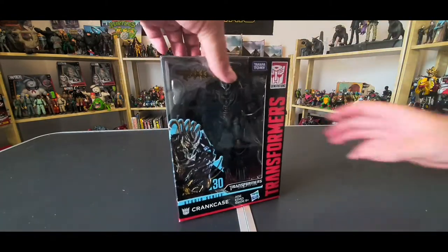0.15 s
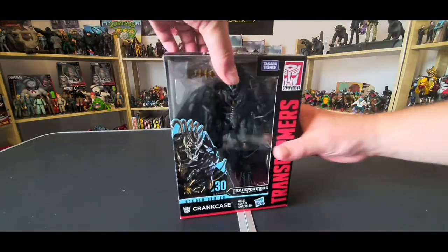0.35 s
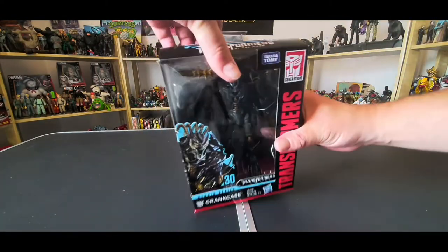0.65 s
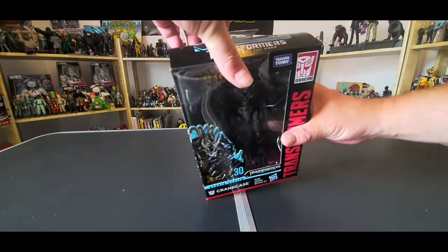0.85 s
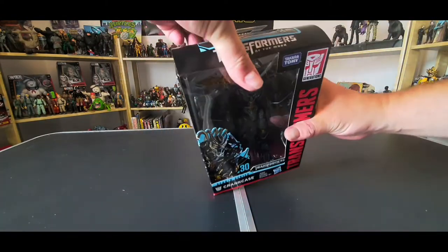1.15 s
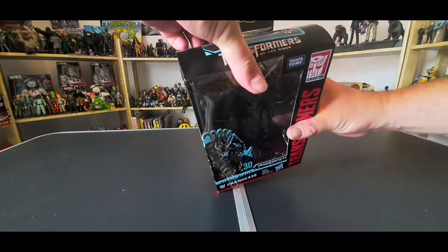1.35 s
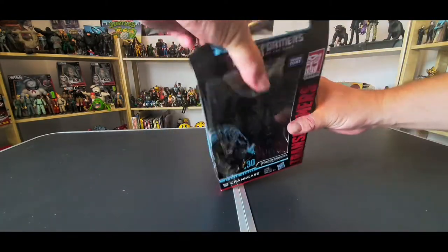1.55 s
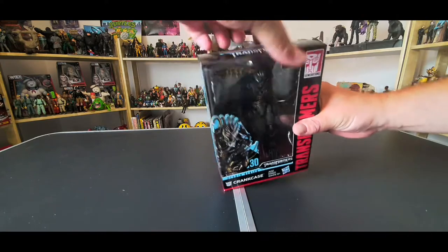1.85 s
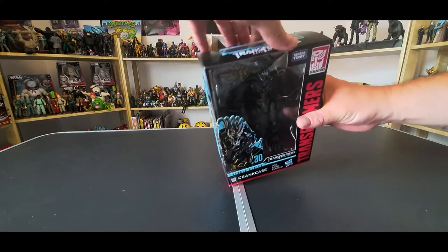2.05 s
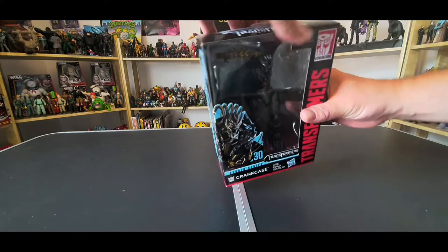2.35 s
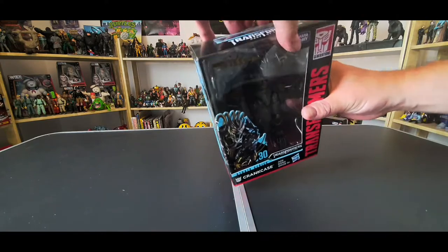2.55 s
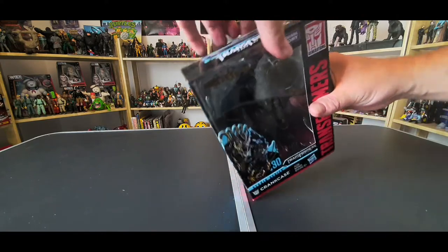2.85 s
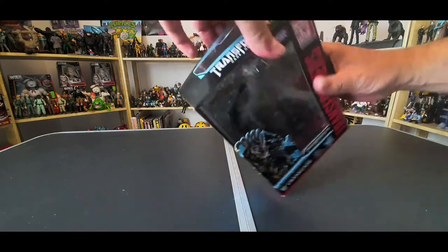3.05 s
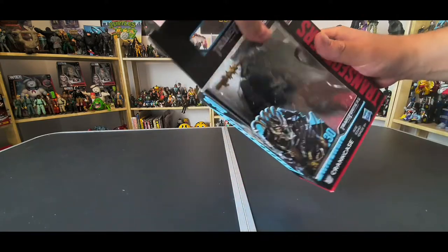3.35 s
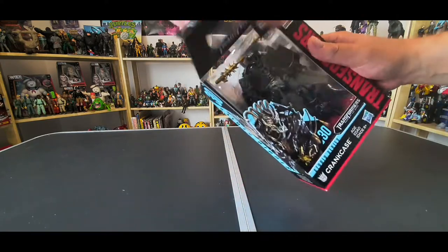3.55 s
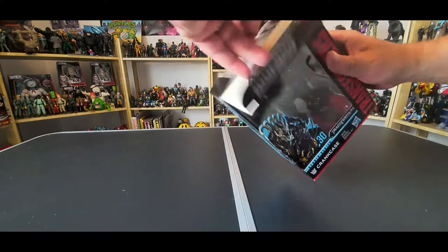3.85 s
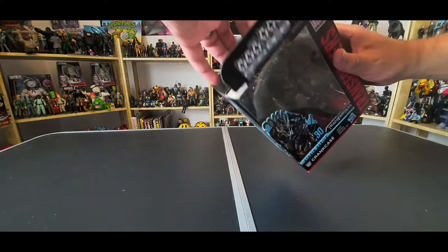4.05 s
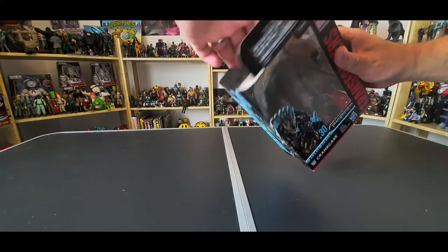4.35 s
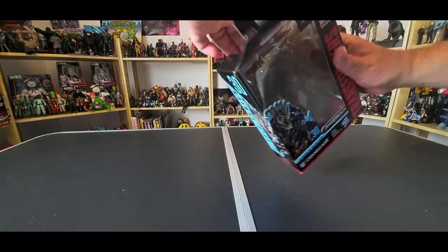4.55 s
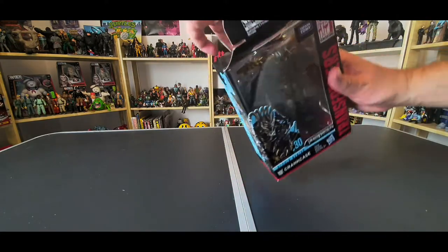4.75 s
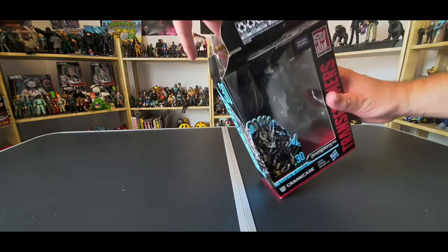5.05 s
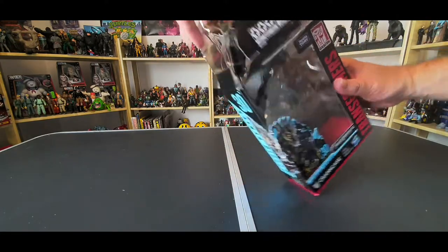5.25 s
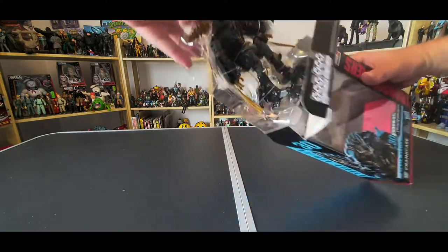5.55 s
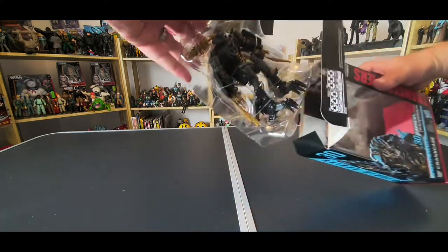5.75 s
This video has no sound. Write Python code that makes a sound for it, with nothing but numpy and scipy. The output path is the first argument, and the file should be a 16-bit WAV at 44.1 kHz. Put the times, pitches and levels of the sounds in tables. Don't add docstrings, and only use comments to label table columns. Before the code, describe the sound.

Close in a small lively room, fingers rub and click on a box's plastic window, then tap its hollow cardboard. One loud knock lands on the table, followed by lighter taps. A dense burst of knocks and bright lid pops comes midway, then separate sharp snaps as the plastic tray is pulled, and a softer sliding scrape at the end.

```python
import sys
import numpy as np
from scipy import signal
from scipy.fft import rfft, irfft, next_fast_len
from scipy.io import wavfile
from scipy.ndimage import uniform_filter1d, map_coordinates

SR = 44100
rng = np.random.default_rng(int(sys.argv[2]) if len(sys.argv) > 2 else 0)


def gain_from_db(level_db):
    decades = np.asarray(level_db, float) / 20
    return 10 ** decades


def wav_record(signal):
    frames = np.transpose(np.atleast_2d(signal))
    bounded = np.clip(frames, -1, 1)
    quanta = np.round(bounded * 32767).astype(np.int16)
    wavfile.write(sys.argv[1], SR, quanta)


N = 259308

# (time [s], crack level [dB], hollow against crack [dB])
PRESSES = [
    (.142, -44, -2.5),
    (.228, -52, -5),
    (.275, -51.5, 6),
    (.303, -49.5, -15),
    (.38, -31, -8),
    (0.474, -48, -9),
    (.488, -70, -9),
]
# (time [s], hollow level [dB], hardness [dB])
TAPS = [(.07, -52, -28), (0.547, -42, -22), (.758, -38, -6.5), (.786, -61, -10), (0.837, -39, -8),
        (0.942, -47, -25), (.98, -40, -13), (1.073, -43, -10), (1.211, -44.5, -6), (1.237, -38.5, -29),
        (1.35, -33, -12.5), (1.435, -35, -14.5), (1.545, -34.5, -5.5), (1.942, -39, -25),
        (2.081, -46.5, -16), (2.309, -51, -15), (2.331, -65, -4), (2.357, -41.5, -19.5), (2.43, -48, -27),
        (2.478, -55.5, -11), (2.555, -35, -10.5), (2.736, -42.5, -12), (2.78, -42, -6), (2.981, -40, -11)]
# (time [s], hollow level [dB], panel against hollow [dB], crack against hollow [dB])
KNOCKS = [(1.518, -48.5, 4, -20), (1.604, -9, -7, -14), (1.783, -27, -11, -4.5), (1.862, -29, -9, -12),
          (1.966, -41, -4.5, -13), (2.632, -24, -7, -13.5), (2.996, -46, 3.5, -4), (3.041, -33, -7, -8),
          (3.099, -24.5, -11, -7.5), (3.137, -21.5, -4.5, 0), (3.156, -12.5, -1.5, -10.5),
          (3.189, -17.5, -7, -33), (3.228, -12, 0.5, -6), (3.292, -13, -0.5, -24), (3.656, -46, 3, -9),
          (3.712, -30, 4.5, -5.5), (3.973, -46.5, -22, -18), (3.989, -42, -35.5, -34),
          (4.027, -37, -6, -13), (4.102, -32, -9, -20), (4.25, -38.5, -8, -18), (4.292, -30, -6.5, -18),
          (4.335, -40, -1, -13), (4.389, -55, -6, 2), (4.412, -30, -30, -40), (4.719, -31, -12, -22),
          (4.988, -36.5, -1, -15), (5.536, -44, 4, -5), (5.587, -43, -2, -23), (5.762, -47, -17, -21)]
# (time [s], panel
# level [dB], panel frequency [Hz], crack against panel [dB], hollow against panel [dB])
LID_POPS = [(.356, -50.5, 1090, -24, 10.5), (.576, -36.5, 1000, -32, 16), (.691, -32, 1680, -4, -4.5),
            (1.12, -41, 1450, 3, 0.5), (1.252, -25.5, 1090, -1, -9), (1.648, -19.5, 1510, -1, -12),
            (1.654, -13, 1500, -11.5, 1), (1.704, -17.5, 1610, -9.5, -2), (3.239, -9, 939, -4, -35.5),
            (3.322, -13.5, 2130, -2.5, -6), (3.409, -5.5, 2540, 0.7, -0.5), (3.427, -12.5, 1575, -1, -15),
            (3.456, -14, 1140, -23, -20)]
# (time [s], panel level [dB], panel frequency [Hz], crack against panel [dB], hollow against panel [dB])
TRAY_SNAPS = [(3.792, -37, 2140, -7, 2), (3.826, -37, 1630, -5.5, -22), (4.176, -30.5, 2830, 4, -7.5),
              (4.458, -23, 1050, -4.5, -5), (4.495, -11, 2200, -2.5, -14), (4.583, -29, 1340, -22, -6.5),
              (4.639, -20.5, 1090, -11, -9), (4.729, -9, 1140, -13, -12.5), (4.797, -23.5, 1410, -14, -10),
              (4.843, -10.5, 1220, -4, -12), (4.911, -28, 2960, -14, -1.5),
              (5.018, -15.5, 1250, -5.5, -12.5), (5.353, -39, 1260, -1, -31),
              (5.449, -27.5, 1300, -37, -16)]
# (time [s], frequency [Hz], peak level
# [dB])
LID_PINGS = [(.15, 2280, -46), (.384, 2400, -47), (.304, 520, -44), (.358, 770, -34.5), (.486, 3260, -49),
             (0.487, 5550, -50), (.49, 2630, -48), (0.579, 1640, -40), (0.711, 1680, -38), (.868, 580, -40),
             (0.997, 1680, -46.5), (1.122, 5180, -43), (1.252, 3230, -30.5), (1.253, 715, -30),
             (1.275, 2940, -41), (1.451, 605, -44.5), (1.467, 1950, -47.5), (1.546, 567, -25),
             (1.653, 1500, -14), (1.659, 1430, -24.5), (1.667, 1610, -20), (1.617, 470, -21.5),
             (1.627, 596, -23), (1.685, 1670, -23.5), (1.865, 1000, -39), (1.712, 1610, -26),
             (1.717, 610, -19.5), (2.361, 1340, -62), (2.366, 504, -38.5), (2.431, 1224, -65),
             (2.569, 524, -32.5), (2.645, 540, -31), (2.781, 520, -38), (3.042, 1120, -35),
             (3.043, 3370, -43.5), (3.157, 620, -27.5), (3.19, 626, -16.5), (3.194, 950, -24.5),
             (3.202, 576, -21), (3.228, 630, -11), (3.238, 3600, -25), (3.25, 1065, -17.5),
             (3.265, 1290, -22.5), (3.292, 580, -16.5), (3.298, 625, -16), (3.322, 827, -11.5),
             (3.326, 810, -16.5), (3.357, 2670, -25.5), (3.404, 890, -31.5), (3.34, 2015, -25.5),
             (3.348, 1950, -14.5),
             (3.409, 2400, -9), (3.412, 663, -6), (3.431, 634, -10.5), (3.436, 560, -11),
              (3.456, 1160, -15), (3.462, 660, -20.5), (3.444, 1180, -13.5), (3.418, 2400, -17),
              (3.434, 2724, -22), (3.5, 1450, -32), (3.476, 1080, -21.5), (3.719, 566, -24.5),
              (3.732, 1970, -33)]
# (time [s], frequency [Hz], peak level [dB])
TRAY_PINGS = [(4.04, 614, -35.5), (4.178, 12000, -43), (4.497, 12500, -33), (4.84, 12200, -36),
              (4.91, 12000, -48), (4.51, 2170, -31), (4.855, 2930, -28), (5.008, 1500, -35),
              (5.012, 605, -28), (5.77, 704, -49.5), (4.116, 575, -39), (4.177, 7190, -29.5),
              (4.185, 7700, -37), (4.192, 7700, -35), (4.195, 3320, -42), (4.293, 3490, -47),
              (4.311, 3140, -47), (4.416, 1200, -37), (4.423, 550, -30), (4.457, 1240, -26),
              (4.496, 762, -17), (4.515, 3060, -31), (4.517, 6670, -26), (4.585, 605, -31),
              (4.591, 1390, -26), (4.611, 3470, -38), (4.639, 3560, -31), (4.639, 755, -25),
              (4.731, 1235, -15), (4.733, 800, -35), (4.751, 1110, -32), (4.768, 1224, -34),
              (4.91, 583, -39), (4.922, 570, -33), (4.743, 764, -20.5), (4.844, 5380, -20),
              (4.847, 2710, -18.5), (4.853, 5370, -32), (4.868, 5540, -36), (5.0185, 1760, -21),
              (5.021, 1070, -39), (5.025, 3920, -25), (5.035, 1850, -26), (5.055, 1300, -29.5),
              (5.217, 1370, -39), (5.268, 880, -48), (5.3, 1100, -39), (5.351, 9400, -45),
              (5.358, 1290, -33), (5.449, 1290, -27.5), (5.449, 3480, -40), (5.456, 3120, -42),
              (5.558, 3230, -40.5), (5.591, 1103, -44)]
# (time [s], peak level [dB])
TICKS = [(0.869, -41), (0.994, -44.5), (1.0125, -47), (1.0535, -39), (1.2024, -47), (4.0344, -42),
         (4.107, -38), (4.1205, -34.5), (4.1274, -52), (4.611, -31), (4.839, -30), (5.5313, -37)]
# (time [s], peak level [dB])
MORE_TICKS = [
    (1.519, -55),
    (1.526, -48),
    (1.535, -50),
    (1.836, -40),
    (1.962, -45),
    (2.716, -56),
    (2.979, -53),
    (3.155, -22),
    (4.718, -44),
    (5.008, -44),
]
# (start [s], hold [s], hollow level [dB], card against hollow [dB])
STROKES = [(0, 0.19, -59.5, -17), (0.274, 0.053, -52.5, -6), (0.437, 0.093, -50.5, -4.5),
           (0.696, 0.11, -54, -4), (0.972, 0.08, -51.5, -5.5), (1.305, 0.084, -56.5, -8),
           (1.572, 0.14, -41.5, -9.5), (1.789, 0.087, -38.5, -5), (2.21, 0.097, -64.5, -25),
           (2.366, 0.15, -68.5, -19), (2.634, 0.03, -57, 1.5), (2.746, 0.055, -49.5, -9),
           (2.87, 0.087, -55.5, -13.5), (3.026, 0.013, -46, -5), (3.142, 0.03, -49.5, 16.5),
           (3.248, 0.022, -44.5, 14), (3.333, 0.035, -44, 13), (3.418, .04, -42.5, 10.5),
           (3.634, 0.029, -55.5, 0), (3.706, 0.2, -57, -3.5), (3.93, 0.021, -60.5, -8),
           (4.065, 0.1, -55, -4.5), (4.157, 0.019, -50.5, -9), (4.395, 0.037, -52.5, 0),
           (4.548, 0.024, -40, -3.5), (4.984, 0.052, -43, -6.5), (5.146, 0.19, -46, -3),
           (5.59, 0.086, -53.5, -6.5), (5.742, 0.023, -63.5, -4)]
# (start [s], hold [s], level [dB])
RUSTLES = [(.6, 0.064, -69), (0.874, 0.034, -66), (1.568, .035, -61.5), (1.66, 0.057, -42),
           (1.785, 0.012, -53.5), (1.843, 0.034, -55), (2.704, 0.054, -74), (2.858, 0.11, -75),
           (3.261, .03, -42.5), (3.323, 0.044, -30.5), (3.407, 0.04, -33.5), (4.04, .2, -72),
           (4.93, .07, -67), (5.1, .36, -64), (5.498, 0.086, -60), (5.65, 0.13, -69.5),
           (5.819, 0.067, -71.5)]
# (time [s], level [dB])
SLIDE = [
    (5.06, -45.5),
    (5.16, -50.5),
    (5.23, -48),
    (5.31, -49),
    (5.388, -49),
    (5.458, -52),
    (5.552, -48.5),
    (5.64, -58.5),
    (5.75, -70),
]
# (time [s], frequency [Hz], peak level [dB], length [s])
SLIPS = [
    (5.528, 477, -32.5, 0.03),
    (5.662, 990, -53, 0.043),
    (5.68, 1740, -59, 0.021),
]
# (time [s], level [dB])
CARD_CATCHES = [
    (2.357, -65),
    (2.428, -71),
    (2.478, -70),
    (2.736, -59),
    (2.979, -57),
    (3.099, -40.5),
    (5.587, -56),
    (5.76, -65.5),
]
# (time [s], level [dB])
WINDOW_DRAGS = [
    (0.141, -60),
    (.229, -61),
    (.381, -59),
    (.42, -63),
]
# (time [s], peak level [dB], frequency [Hz])
THUMPS = [(0.377, -44.5, 108), (0.576, -37.5, 234), (0.679, -43.5, 188), (0.93, -60, 53.8),
          (1.25, -69, 293), (1.605, -23.5, 295), (1.65, -28, 83.4), (1.777, -33.5, 131), (1.96, -38, 56.5),
          (2.358, -57, 84), (2.555, -48, 290), (2.63, -34, 288), (2.776, -48, 105), (3.029, -42, 150),
          (3.109, -40, 102), (3.185, -30, 192), (3.228, -28.5, 125.6), (3.294, -24, 250), (3.41, -32, 300),
          (3.432, -23.5, 78), (3.713, -29, 155), (3.973, -44.5, 56.5), (4.423, -67, 299),
          (4.493, -70.5, 280), (4.724, -41.5, 149), (4.841, -34.5, 206), (5.005, -27, 114),
          (5.517, -44, 207.3), (5.668, -52.5, 105)]
# (time [s], level [dB])
SHIFTS = [(.14, -61.5), (.72, -77), (1.02, -59.5), (2.08, -56.5), (2.36, -64.5), (2.66, -70), (2.8, -71),
          (3.72, -63.5), (4.3, -61), (4.55, -59), (5.18, -61), (5.4, -61), (5.6, -67)]

# (frequency [Hz], width [Hz], level [dB])
HOLLOW_MODES = [(400.4, 140, -9.5), (514.8, 36, 4), (603, 51.6, -1), (716, 130, -4)]
# (frequency [Hz], width [Hz], level [dB])
FILM_MODES = [(2400, 410, 8), (3940, 350, 3), (6000, 690, 5.5), (6870, 380, 7.5), (7700, 500, 8),
              (9250, 350, 4), (10800, 1600, -1)]
# (frequency [Hz], density [dB per Hz])
CARD_COLOUR = [(410, -38.5), (700, -4.5), (884, -4), (1040, 0), (1300, -4.5), (1570, -8.5), (3450, -17),
               (4500, -24.5), (5850, -56.5), (9900, -120)]
# (frequency [Hz], density [dB per Hz])
PLASTIC_COLOUR = [(1940, -15), (3300, -7), (6430, -6.5), (8000, -7), (10200, -15), (13500, -24),
                  (15400, -27.5), (16000, -31)]
# (frequency [Hz], density [dB per Hz])
TRAY_COLOUR = [(210, -46), (350, -14.5), (581, -3), (798, 0.5), (1350, -2.5), (1800, -7), (2700, -16.5),
               (3500, -16), (4200, -24.5), (9330, -30.5), (15500, -59)]
# (frequency [Hz], density [dB per Hz])
DULL_COLOUR = [(500, -38), (800, -1), (1200, 3), (1700, -13), (2100, -37), (3400, -28), (4300, -58.5)]
# (frequency [Hz], density [dB per Hz])
RUMBLE_COLOUR = [(12, -49), (20, -16), (46, 0.5), (65, 2), (167, -3), (290, -2), (330, -5.5), (430, -45),
                 (730, -120)]
# (frequency [Hz], density [dB per Hz])
SWAY_COLOUR = [(12, -52.5), (25, -18), (60, -1.5), (120, -11.5), (190, -19), (300, -39), (600, -120)]
# (frequency [Hz], density [dB per Hz])
HISS_COLOUR = [(15, -45), (25, -5.5), (89, -4.5), (295, -8), (536, -3.5), (648, -6.5), (973, -19.5),
               (1350, -33), (4500, -31.5), (6800, -21.5), (9760, -25.5), (15100, -31), (16300, -51)]
# (frequency [Hz], T60 [s])
ROOM_T60 = [(100, 0.98), (300, 0.41), (800, 0.18), (4000, 0.28), (12000, 0.17)]
# (frequency [Hz], level [dB])
ROOM_COLOUR = [(60, -5.5), (250, 6.5), (550, -7), (1200, 2), (4000, 4), (8000, 1.5), (14000, 6)]
# (delay [s], level [dB])
WALL_ECHOES = [
    (.0035, -24),
    (.0085, -24.5),
    (.012, -20.5),
    (.017, -15.5),
    (.0225, -20),
    (.029, -25.5),
]
# (frequency [Hz], level [dB])
MIC_COLOUR = [(2800, 0), (3500, 0.5), (3900, -2.5), (4300, -2), (5200, 0), (9000, 0), (13000, 0.5)]

WALL_HZ, WINDOW_HZ = 1090, 2210
FILM_UNTIL_S = 0.45
TAIL = SR // 3


def blows():
    rows = [(s, db + hollow, WINDOW_HZ, db - 9, db, -0.5) for s, db, hollow in PRESSES]
    rows += [(s, db, WALL_HZ, db + hard, db + 1.3 * hard - 3, 1) for s, db, hard in TAPS]
    rows += [(s, db, WALL_HZ, db + panel, db + crack, -1) for s, db, panel, crack in KNOCKS]
    for table, room_db in ((LID_POPS, -0.5), (TRAY_SNAPS, -3)):
        rows += [(s, db + hollow, hz, db, db + crack, room_db) for s, db, hz, crack, hollow in table]
    return np.array(sorted(rows))


def contacts():
    s, hollow_db, panel_hz, panel_db, crack_db, room_db = blows().T[..., None]
    t = np.arange(SR // 25) / SR
    push = np.exp(-((t - 0.001) / 0.00024) ** 2)
    push = push + 0.77 * gain_from_db(-60 * t / 0.0097) * rng.standard_normal((len(s), len(t)))
    hollow = peak1(filtered(push, resonances(HOLLOW_MODES)))
    card, ring = resonances([(1290, 3200, 0)]), resonances([(panel_hz, 220, 5)])
    panel = peak1(filtered(snaps(len(s), t, t60=0.037), lambda f: card(f) ** 3 * (1 + ring(f))))
    film = peak1(filtered(snaps(len(s), t, t60=0.026), film_response))
    crack = np.where(s < FILM_UNTIL_S, film, cracks(len(s), t, t60=0.02))
    blow = gain_from_db(hollow_db - 4) * hollow + gain_from_db(panel_db - 5) * panel + gain_from_db(crack_db - 3) * crack
    drier_db = 0.012 * (np.maximum(hollow_db, panel_db) + 28.5)
    return add(np.zeros(N), s[:, 0], answer(blow, own_db=3.9, wet_db=room_db + 4.5 - drier_db))


def snaps(count, t, t60):
    fade = gain_from_db(-30 * t / t60) * (1 - np.exp(-t / 0.0003))
    x = rng.standard_normal((count, len(t))) * fade
    for _ in range(2):
        z = rfft(x * fade)
        x = irfft(z / (np.abs(z) + 1e-9), len(t))
    return x * np.sqrt(fade)


def cracks(count, t, t60):
    return peak1(filtered(snaps(count, t, t60), lambda f: colour(PLASTIC_COLOUR)(f) / (1 + (f / 10500) ** 3)))


def pings():
    s, hz, db = np.transpose(LID_PINGS + TRAY_PINGS)[..., None]
    t = np.arange(SR // 25) / SR
    t60 = 0.008 + 9 / hz
    ring = np.sin(2 * np.pi * hz * t) * gain_from_db(-60 * t / t60) * (1 - np.exp(-t / 0.0006))
    return add(np.zeros(N), s[:, 0], answer(gain_from_db(db - 2.5) * peak1(ring), wet_db=-2, size=SR // 5))


def ticks(table, size=TAIL):
    s, db = np.transpose(table)[..., None]
    rows = gain_from_db(db - 5) * cracks(len(s), np.arange(SR // 100) / SR, t60=0.012)
    return add(np.zeros(N), s[:, 0], answer(rows, wet_db=0, size=size))


def rubbing():
    s, hold, db, card_db = np.transpose(STROKES)[..., None]
    card_stroke = strokes(s, hold, db + card_db)
    rustle = strokes(*np.transpose(RUSTLES)[..., None], sharper=1.9)
    at, hollow_hit, _, panel_hit, crack_hit, _ = blows().T
    shake_t60 = 0.35
    hollow = strokes(s, hold, db) + trail(at, hollow_hit - 17.5, shake_t60)
    card = card_stroke + trail(at, panel_hit - 18.5, shake_t60) + lead(at, panel_hit - 29)
    plastic = gain_from_db(-16.5) * card_stroke + rustle
    plastic = plastic + trail(at, crack_hit - 21, shake_t60) + lead(at, crack_hit - 26.5)
    box = resonances(HOLLOW_MODES)
    hollow_scratch = scratch(lambda f: box(f) * np.minimum(1, (900 / (f + 1)) ** 2), 500, 2.2, 2.85)
    card_scratch = scratch(colour(CARD_COLOUR), 3500, 4.1, 3.2)
    plastic_scratch = scratch(colour(PLASTIC_COLOUR), 3400, 2.8, 2.1)
    return gain_from_db(-4.5) * hollow * hollow_scratch + gain_from_db(-3.5) * (card * card_scratch + plastic * plastic_scratch)


def scratch(response, per_s, spread_db, lump_db):
    size_db = spread_db * np.minimum(rng.exponential(size=N), 3)
    force = (rng.random(N) < per_s / SR) * rng.standard_normal(N) * gain_from_db(size_db)
    force = force * gain_from_db(lump_db * (0.52 * wobble(10) + 1.35 * wobble(45)))
    return unit(answer(filtered(force, response)[None], wet_db=2)[0, :N])


def slide():
    s, db = np.transpose(SLIDE)
    level_db = np.interp(np.arange(N) / SR, s, db, left=-120, right=-120)
    level = gain_from_db(uniform_filter1d(level_db, size=SR // 25) + 2.5)
    return level * scratch(colour(TRAY_COLOUR), 2200, 2.2, 1.7)


def slips():
    s, hz, db, length = np.transpose(SLIPS)[..., None]
    t = np.arange(SR // 20) / SR
    rows = gain_from_db(db) * np.sin(2 * np.pi * hz * t) * np.sin(np.pi * np.clip(t / length, 0, 1))
    return add(np.zeros(N), s[:, 0], answer(rows, wet_db=-15))


def catches():
    card = trail(*np.transpose(CARD_CATCHES), 0.34)
    window = trail(*np.transpose(WINDOW_DRAGS), 0.38)
    return card * scratch(colour(DULL_COLOUR), 2500, 2.1, 0.72) + window * scratch(film_response, 3000, 3, 0.8)


def thumps():
    s, db, hz = np.transpose(THUMPS)[..., None]
    t = np.arange(SR // 10) / SR
    swing = np.sin(2 * np.pi * hz * t) * gain_from_db(-18 * t * hz)
    swing = swing + 0.14 * np.sin(2 * np.pi * 125 * t) * gain_from_db(-60 * t / 0.066)
    rows = gain_from_db(db + 1) * peak1(swing * (1 - np.exp(-t / 0.00024)))
    return add(np.zeros(N), s[:, 0], answer(rows, wet_db=-2.5))


def tremble():
    s, hold, db, _ = np.transpose(STROKES)[..., None]
    thump_s, thump_db, _ = np.transpose(THUMPS)
    level = gain_from_db(-74.5) + gain_from_db(-18) * strokes(s, hold, db) + trail(thump_s, thump_db - 12.5, 0.5)
    return level * scratch(colour(RUMBLE_COLOUR), 400, 1.5, 3)


def shifts():
    t = np.arange(N) / SR
    half_s = 0.093
    level = sum(gain_from_db(db) * np.exp(-((t - s) / half_s) ** 2) for s, db in SHIFTS)
    return level * unit(filtered(rng.standard_normal(N), colour(SWAY_COLOUR)))


def hiss():
    return gain_from_db(-71) * unit(filtered(rng.standard_normal(N), colour(HISS_COLOUR)))


def strokes(s, hold, db, sharper=1):
    t = np.arange(0, N, 32) / SR
    rise_db = 261.5 * np.maximum(s - t, 0)
    fall_db = 194.5 * np.maximum(t - s - hold, 0)
    level_db = db - sharper * (rise_db + fall_db)
    return np.interp(np.arange(N) / SR, t, np.linalg.norm(gain_from_db(level_db), axis=0))


def trail(times, db, t60):
    t = np.arange(0, N, 32) / SR
    x = np.maximum(t - times[:, None], 0)
    gate_db = 20 * np.minimum(x / 0.19, 3) ** 3
    level = gain_from_db(db[:, None] - 60 * x / t60 - gate_db) * (x > 0)
    return np.interp(np.arange(N) / SR, t, np.linalg.norm(level, axis=0))


def lead(times, db):
    t = np.arange(0, N, 32) / SR
    x = times[:, None] - t
    level = gain_from_db(db[:, None]) * np.exp(-np.abs(x) / 0.0028) * (x > 0)
    return np.interp(np.arange(N) / SR, t, np.linalg.norm(level, axis=0))


def answer(rows, wet_db, own_db=0, size=TAIL):
    hz, t, z = signal.stft(rng.standard_normal((len(rows), size)), SR, nperseg=256)
    fade_db = -60 * t / along(ROOM_T60, hz)[:, None] - 20 * (t / 0.16) ** 3
    own_colour_db = own_db * rng.standard_normal(z.shape[:2] + (1,))
    z = z * gain_from_db(fade_db + along(ROOM_COLOUR, hz)[:, None] + own_colour_db)
    tail = signal.istft(z, SR, nperseg=256)[1][:, :size]
    path = tail * (1 - np.exp(-np.arange(size) / SR / 0.0016))
    path = path / np.linalg.norm(path, axis=1, keepdims=True)
    for s, db in WALL_ECHOES:
        path[:, round(s * SR)] += gain_from_db(db)
    path = path * gain_from_db(wet_db)
    path[:, 0] = 1
    return signal.fftconvolve(rows, path, axes=1)


def resonances(modes):
    def response(f):
        total = 0
        for k, (centre, width, db) in enumerate(modes):
            damping = 1j * f * width
            total = total + (-1) ** k * gain_from_db(db) * damping / (centre * centre - f * f + damping)
        return total
    return response


def film_response(f):
    return resonances(FILM_MODES)(f) ** 2


def colour(points):
    return lambda f: gain_from_db(along(points, f))


def along(points, hz):
    f, v = np.transpose(points)
    return np.interp(np.log(hz + 1), np.log(f + 1), v)


def filtered(x, response):
    m = next_fast_len(x.shape[-1] + 2048)
    return irfft(rfft(x, m) * response(np.fft.rfftfreq(m, 1 / SR)), m)[..., :x.shape[-1]]


def wobble(rate):
    knots = rng.standard_normal(int(N * rate / SR) + 4)
    return map_coordinates(knots, [np.arange(N) * rate / SR])


def unit(x):
    return x / np.sqrt(np.mean(x ** 2) + 1e-20)


def peak1(x):
    return x / np.max(np.abs(x), axis=-1, keepdims=True)


def add(track, times, rows):
    for s, x in zip(times, rows):
        part = track[round(s * SR):][:len(x)]
        part += x[:len(part)]
    return track


def duck(x):
    now = np.abs(uniform_filter1d(x ** 2, size=SR // 50)) + 1e-12
    keep = np.exp(-1 / (0.51 * SR))
    recent = signal.lfilter([1 - keep], [1, -keep], now)
    gain = np.sqrt(now / (now + gain_from_db(2 * -33.5) * recent))
    return x * np.maximum(gain, gain_from_db(-7))


def scene():
    box = contacts() + pings() + ticks(TICKS) + ticks(MORE_TICKS, size=SR // 6)
    friction = rubbing() + slide() + slips() + catches()
    background = thumps() + tremble() + shifts() + hiss()
    return (box + friction + background)[None]


def band_limit(x):
    return signal.sosfilt(signal.butter(12, 16490, fs=SR, output="sos"), x)


def record(dry):
    def microphone(f):
        bass_cut = (1j * f / (36 + 1j * f)) ** 3
        return bass_cut * colour(MIC_COLOUR)(f) / (1 + (f / 15700) ** 130)
    mix = duck(filtered(dry, microphone))
    return band_limit(mix)


dry = scene()
out = record(dry)
wav_record(out)
```